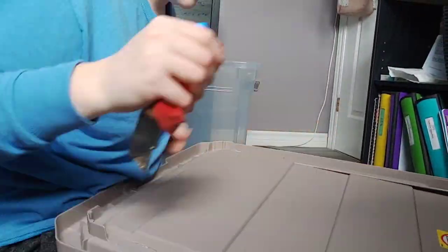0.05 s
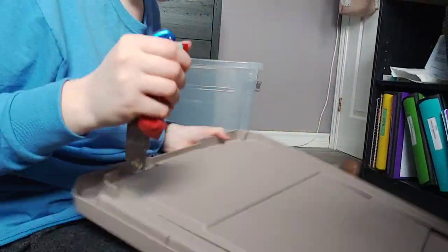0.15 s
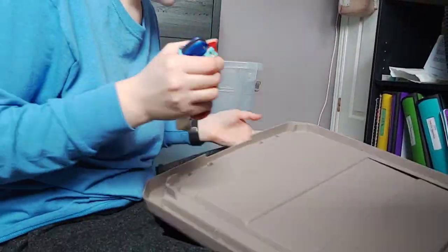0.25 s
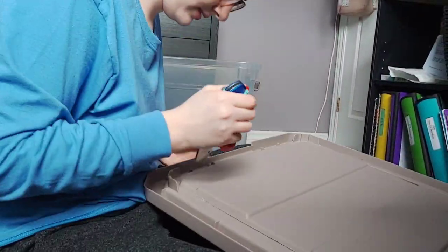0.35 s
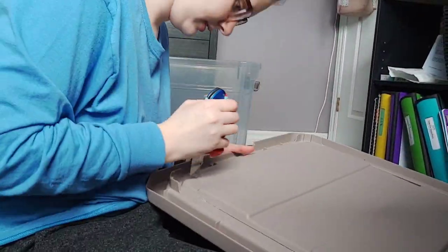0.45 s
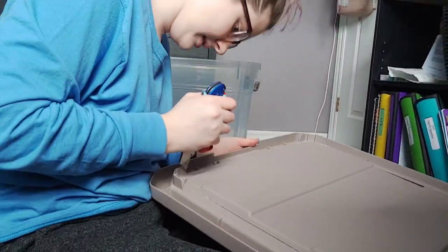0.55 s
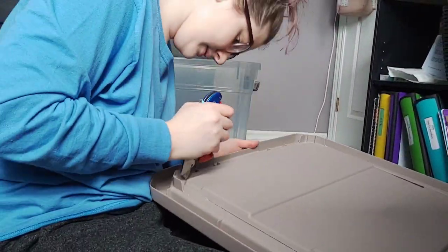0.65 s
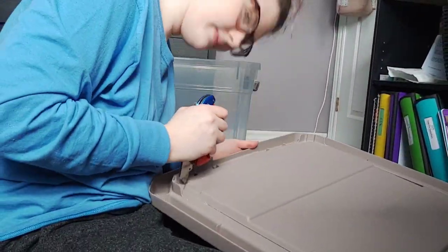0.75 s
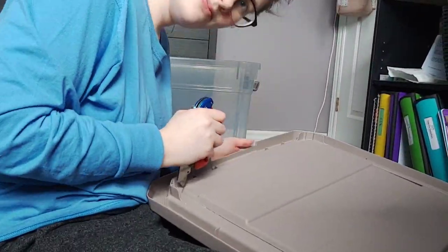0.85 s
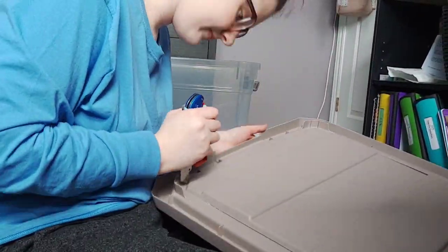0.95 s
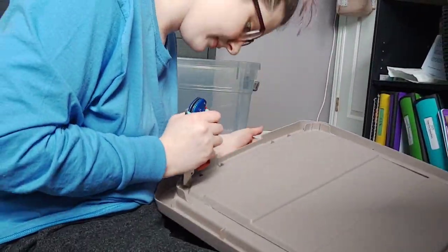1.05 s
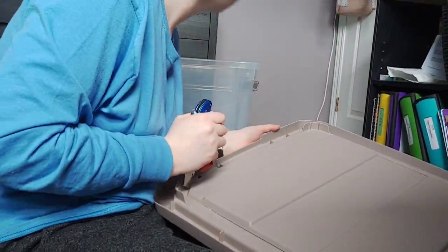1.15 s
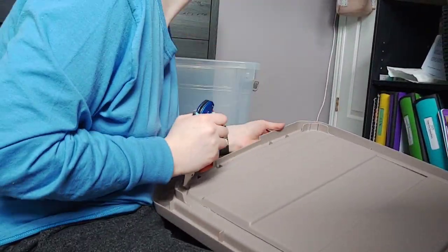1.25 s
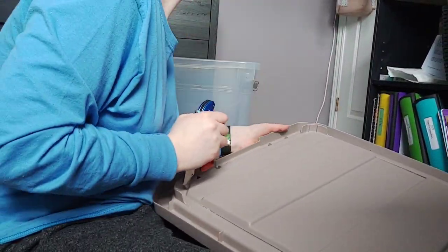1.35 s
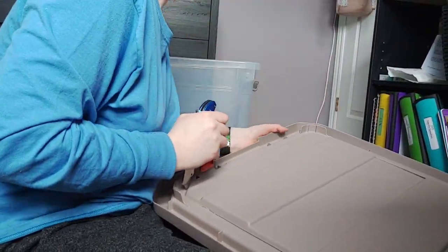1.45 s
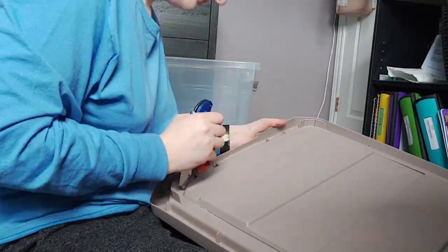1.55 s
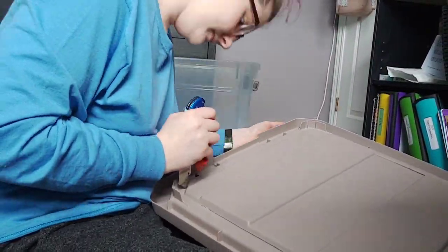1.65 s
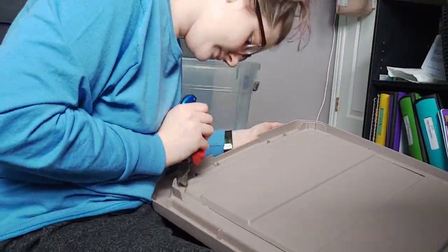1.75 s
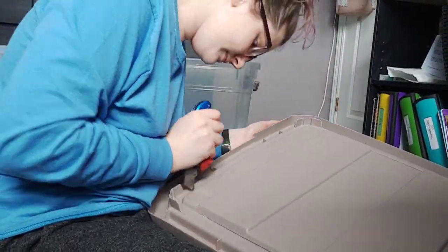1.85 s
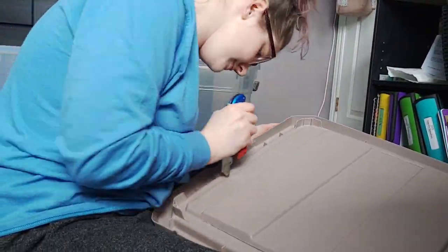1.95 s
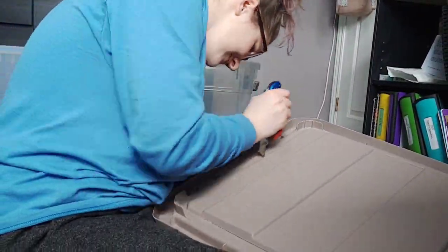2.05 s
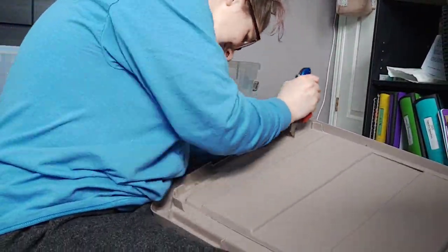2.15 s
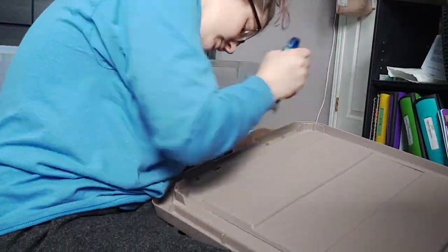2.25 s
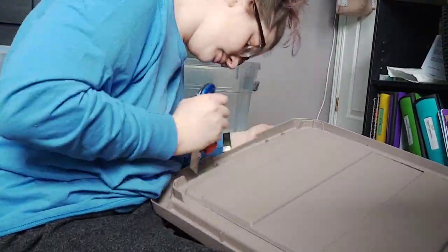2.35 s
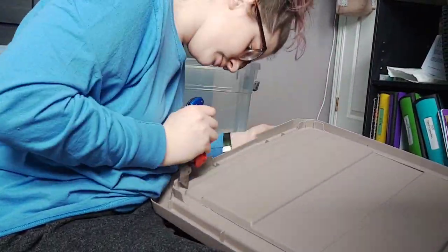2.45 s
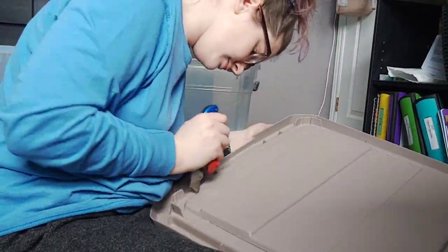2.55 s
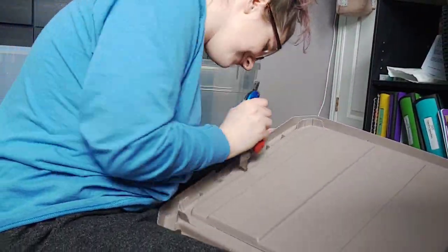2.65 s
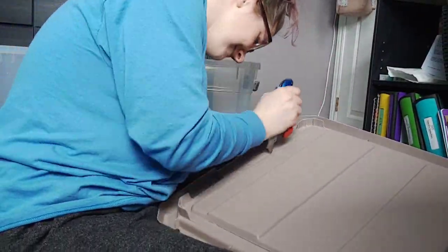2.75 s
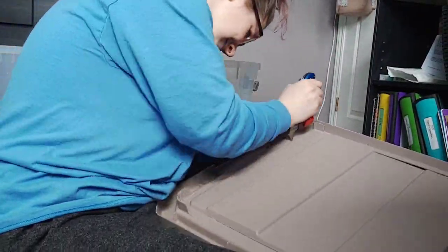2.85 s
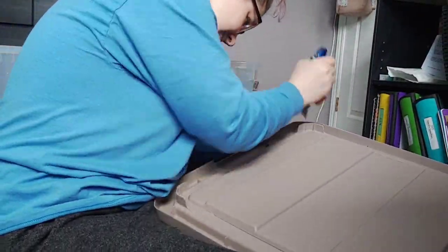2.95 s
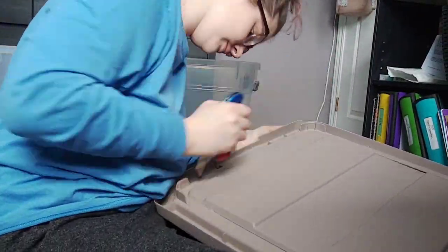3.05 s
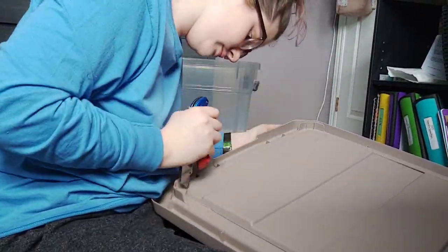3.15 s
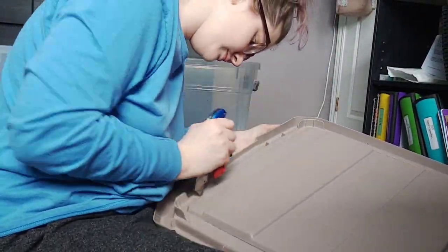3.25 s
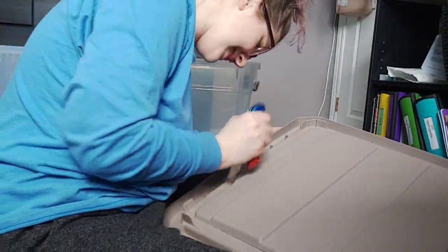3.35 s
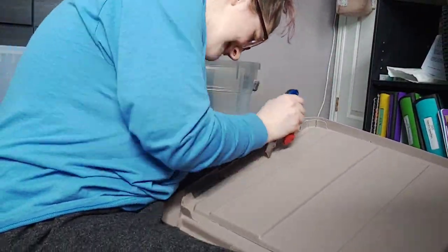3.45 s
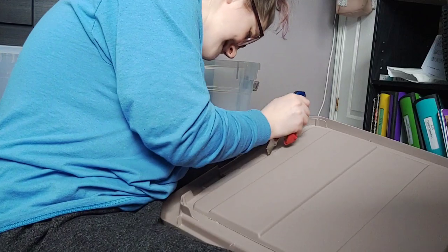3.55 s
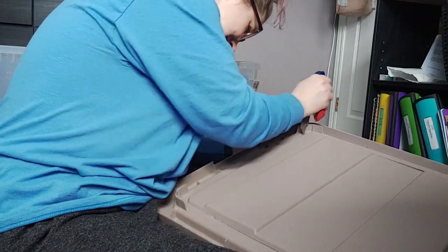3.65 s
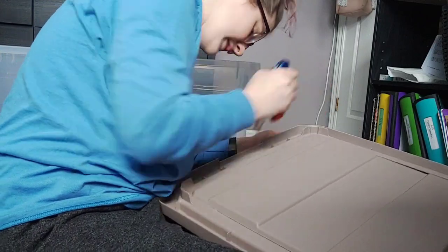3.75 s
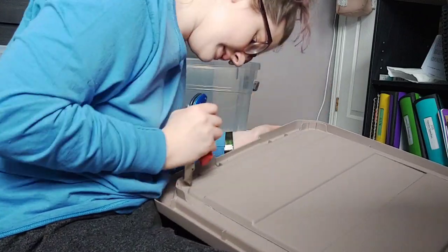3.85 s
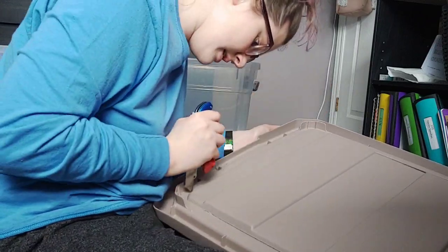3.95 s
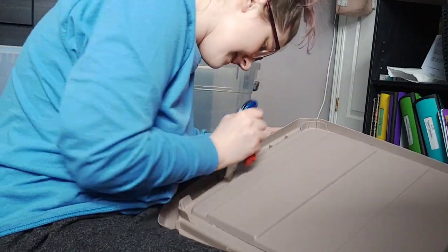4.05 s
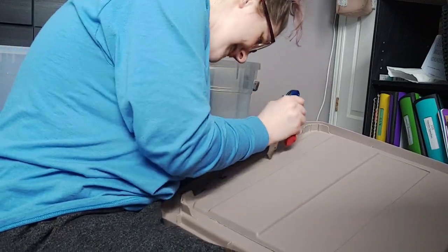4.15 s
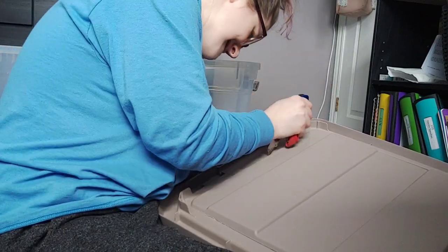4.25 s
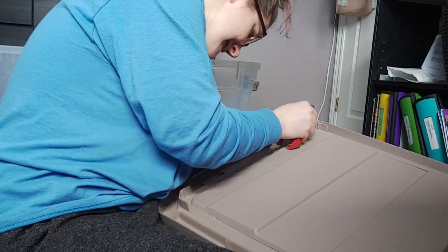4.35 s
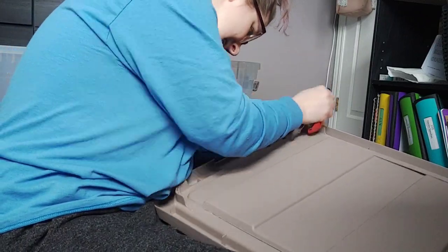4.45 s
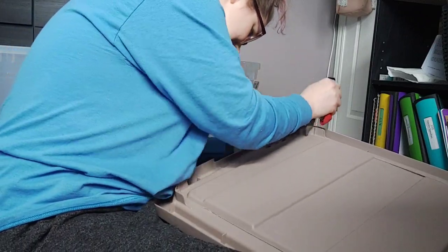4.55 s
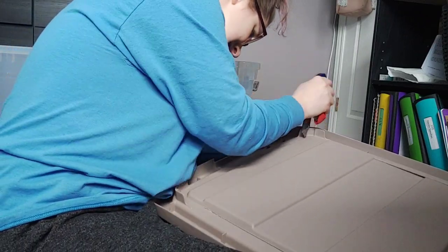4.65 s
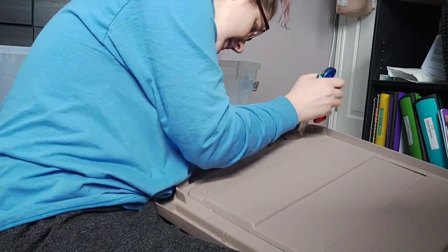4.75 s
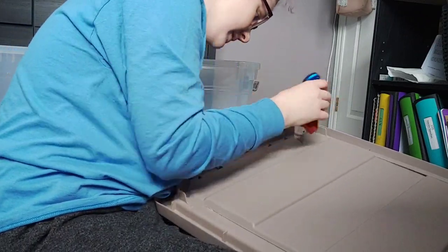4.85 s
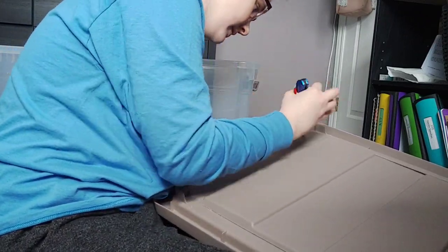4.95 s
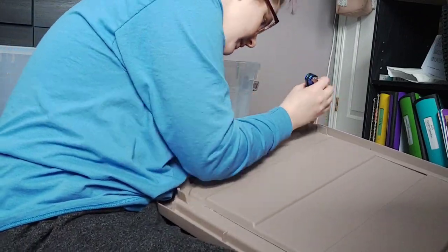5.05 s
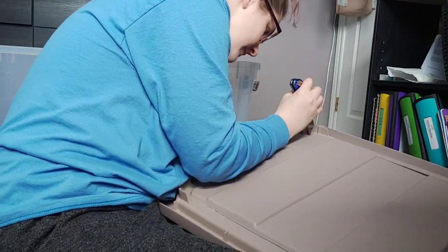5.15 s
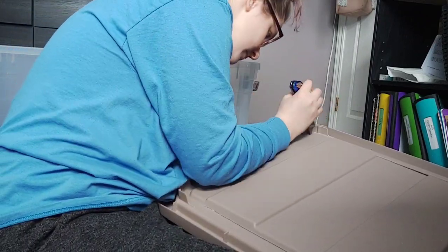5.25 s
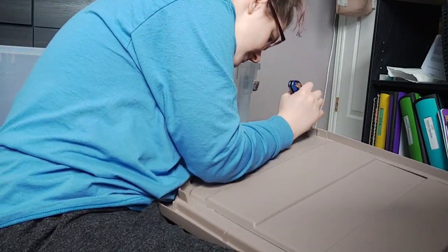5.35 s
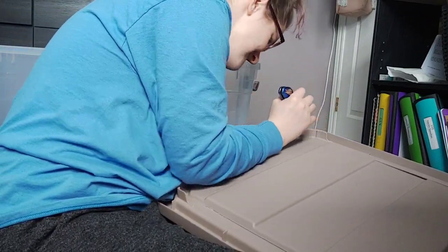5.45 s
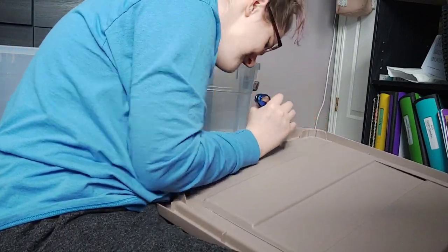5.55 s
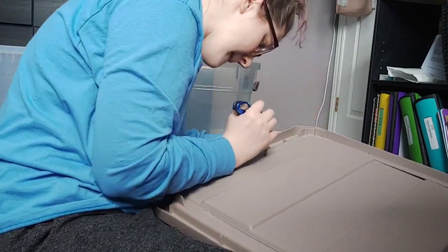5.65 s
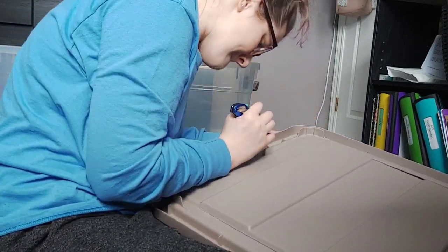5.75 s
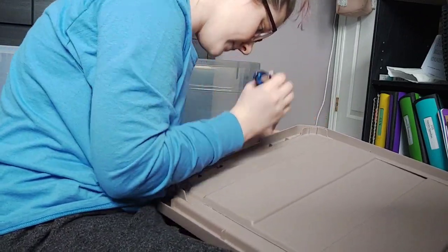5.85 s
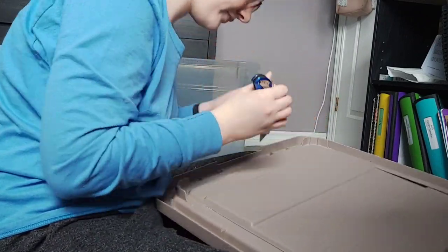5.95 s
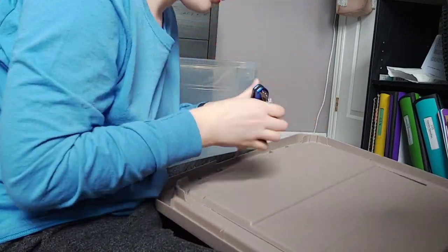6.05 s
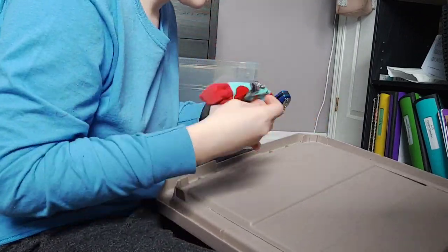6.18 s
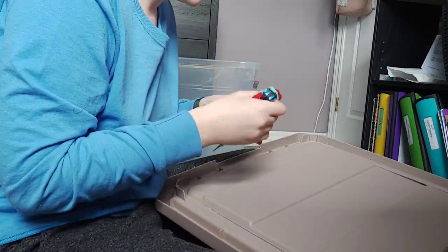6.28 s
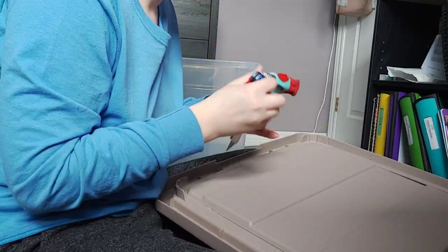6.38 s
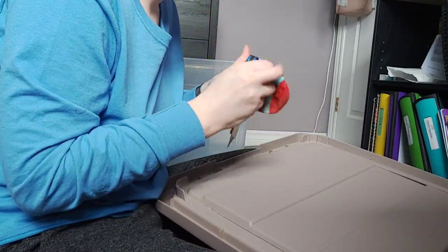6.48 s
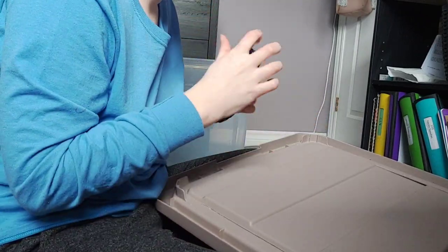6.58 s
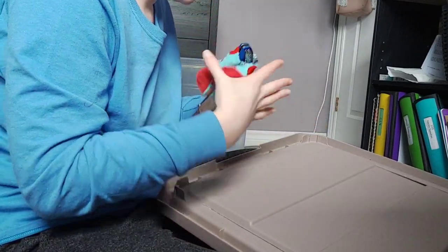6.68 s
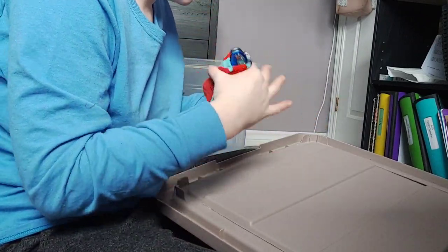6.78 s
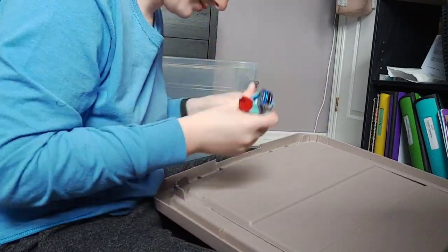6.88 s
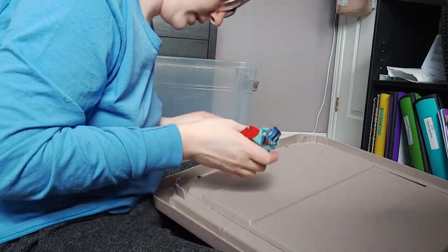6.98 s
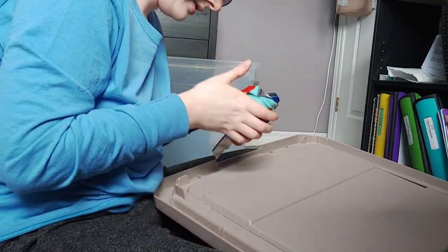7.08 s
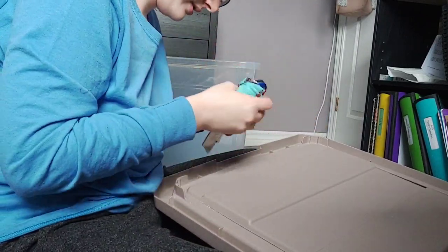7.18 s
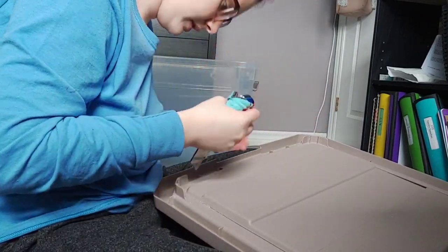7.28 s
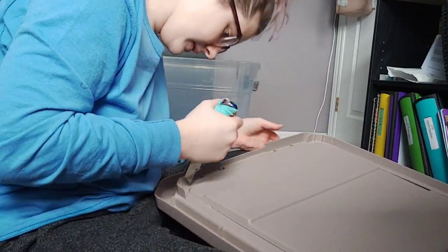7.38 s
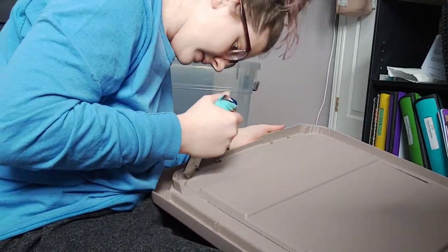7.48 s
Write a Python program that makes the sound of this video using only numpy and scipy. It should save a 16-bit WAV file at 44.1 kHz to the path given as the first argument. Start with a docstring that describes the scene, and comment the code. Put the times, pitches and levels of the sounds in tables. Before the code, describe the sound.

A plastic storage lid knocks hollowly at about 0.2 seconds, the loudest sound, followed by a quick clatter and scrape. Light scuffs, ticks and faint creaks follow. From about 1.8 seconds a box cutter works through the plastic in short, dry, irregular rasps, slipping and sticking in clusters, with small clicks between them. Sharper cracks come at about 4.7, 5.1, 5.4 and 5.9 seconds, each ringing briefly in the lid, mixed with more scraping and tiny creaks. After 6 seconds the cutting stops; skin rubs softly on the handle with a few faint ticks until about 7.3 seconds. A light hollow knock on the lid comes at 7.4 seconds. Everything is close, in a small furnished room with little echo. Underneath are faint sleeve rustle, hiss and rumble, with a faint low wavering hum near 5 and 7 seconds.

```python
"""A small room, close to a plastic storage box: a box cutter is pulled again and again through its lid.
The lid knocks as it is set in place; then the blade rasps along in short slips, sticks, and cracks free.
Every tiny tear and snap rings the lid's damped modes, and now and then one mode sings out as a creak.
Skin rubs the handle, sleeves rustle over faint hiss and rumble, and twice a low hum glides past."""
import sys
import numpy as np
from scipy import signal
from scipy.fft import rfft, irfft
from scipy.io import wavfile
from scipy.ndimage import uniform_filter1d

SR = 44100
rng = np.random.default_rng(int(sys.argv[2]) if len(sys.argv) > 2 else 0)


def log_audio(samples):
    """Write samples as a 16-bit WAV file to the path given in sys.argv[1]."""
    # one column per channel
    frames = np.atleast_2d(samples).T
    # limit to full scale, then quantise
    limited = np.clip(frames, -1, 1)
    pcm = np.round(limited * 32767).astype(np.int16)
    wavfile.write(sys.argv[1], SR, pcm)


N = 331632


def amp(db):
    """Decibels to gain."""
    return 10 ** (np.asarray(db) / 20)


def unit(x):
    """Scales to an rms of one."""
    return x / np.sqrt(np.mean(x ** 2) + 1e-20)


def pan(left_db):
    """Stereo gains that put the left channel left_db above the right."""
    return amp([[left_db / 2], [-left_db / 2]])


def curve_at(points, hz):
    """Reads a curve over log frequency."""
    freq_hz, value = np.transpose(points)
    return np.interp(np.log(hz + 1), np.log(freq_hz), value)


def flutter(size, smooth_samples):
    """A smoothed random modulator with an rms of one."""
    return unit(uniform_filter1d(rng.standard_normal(size), size=smooth_samples))


def add(mix, start_s, sound):
    """Mixes a stereo sound in at start_s."""
    part = mix[:, max(round(start_s * SR), 0):][:, :sound.shape[1]]
    part += sound[:, :part.shape[1]]


# Slips of the blade; body and treble are relative to the level:
# start_s, length_s, level_db, body_db, treble_db
SLIPS = [(.32, 0.021, -43, 2, 7), (.503, .032, -52, 8, 0.5), (1.832, 0.043, -42, 0, -5),
         (1.901, .028, -46, -4, -5), (1.938, 0.18, -50, -6, -5), (2.108, 0.075, -46, -10.5, -5.5),
         (2.526, 0.03, -37.5, -3.5, -2), (2.564, 0.061, -44, -4, -8), (2.638, .046, -44.5, -9, -10),
         (2.743, 0.062, -42.5, -7.5, -5.5), (2.854, 0.029, -37.5, -12, -1.5), (2.94, 0.024, -58, -6, 6.5),
         (3.248, .026, -37.5, -4, -0.5), (3.277, .021, -44, 0.5, -2.5), (3.308, 0.064, -70, 15, 4),
         (3.359, 0.029, -45, -3.5, -2), (3.397, 0.031, -45, -8, -9.5), (3.601, 0.028, -45, -2, -2.5),
         (3.628, 0.033, -38, -12.5, -5.5), (3.998, 0.013, -41, -0.5, -5.5), (4.014, 0.027, -41, -1, 1.5),
         (4.064, 0.066, -45, -4.5, -3), (4.413, 0.021, -38.5, -1.5, -4.5), (4.443, 0.029, -52.5, -1, -3),
         (4.504, 0.058, -54, -1, -0.5), (4.643, 0.0056, -36, 0.5, -4), (4.671, 0.032, -45.5, -0.5, 0),
         (5.427, 0.0083, -40.5, -1.5, -2.5), (5.443, 0.055, -49, -2, -5), (5.527, 0.07, -51.5, 0, -6),
         (5.877, 0.041, -45, 1.5, -6), (5.922, 0.017, -39, -3, 3.5)]


def blade_slips(attack_s=0.022, release_s=0.039):
    """The blade slips forward through the plastic in bright, even rasps; short ones peak at their end."""
    out = np.zeros((2, N))
    spots = [lid_ring(t60_s=0.021, panel_db=-17)[:, :2400] for _ in range(24)]
    for start_s, length_s, level_db, body_db, treble_db in SLIPS:
        rise_s = min(attack_s, length_s)
        push = pressure(rise_s, hold_s=length_s - rise_s, fall_s=min(release_s, 1.66 * length_s))
        rasp = stick_slip(push, spots, grains_per_s=12000, spread_db=2.5, judder_db=1.6)
        rasp = band_eq(rasp, np.sum(push ** 2), level_db, body_db, treble_db, bite_db=1.4, left_db=1.5)
        add(out, start_s, rasp)
    return out


def pressure(rise_s, hold_s, fall_s, size=16000):
    """Pressure on the lid builds, holds and lets go."""
    t = np.arange(size) / SR
    attack = np.sin(np.pi / 2 * np.clip(t / rise_s, 0, 1)) ** 1.5
    release = np.clip(1 - (t - rise_s - hold_s) / fall_s, 0, 1) ** 2
    return attack * release


def stick_slip(push, spots, grains_per_s, spread_db, judder_db, spot_s=0.05):
    """Thousands of tiny tears or catches a second, clumped by stick and slip; each rings the lid."""
    size = len(push)
    judder = flutter(size, 140)
    grains = (rng.random(size) < grains_per_s / SR) * rng.choice([-1, 1], size)
    accents = np.minimum(rng.exponential(1, size), 4)
    grains = grains * push * amp(spread_db * accents + judder_db * judder)
    # the contact travels, crossfading from one spot's ring to the next
    travel = np.arange(size) / SR / spot_s
    spots_passed = int(travel[push > 0].max(initial=0)) + 2
    out = 0
    for step, spot in enumerate(rng.permutation(len(spots))[:spots_passed]):
        fade = np.cos(np.pi / 2 * np.minimum(abs(travel - step), 1))
        out = out + signal.oaconvolve((grains * fade)[None], spots[spot], axes=1)
    return out


# Knocks, cracks and ticks, voiced like the slips: start_s, level_db, body_db, treble_db
SNAPS = [(.1569, -10.5, -0.5, -9), (0.1856, -21, -12, 4), (0.211, -35, 7.5, -25), (.335, -31, -4.5, 7),
         (0.7686, -58.5, 7, -1.5), (1.583, -49, 8.5, -8.5), (1.735, -66, 12.5, -18),
         (1.8262, -53.5, 15.5, -2), (2.225, -52, -7.5, 5), (2.2905, -62, -22.5, 7.5),
         (2.9417, -58.5, -26.5, 14), (3.227, -52, 12.5, 6.5), (3.885, -41, 6, -7), (4.354, -57, 9, -20),
         (4.677, -31, 3, 5), (4.6792, -26, -10, 2), (4.791, -44, 6.5, -12), (4.958, -41, 1, -12),
         (5.1099, -29, -4, -25), (5.1145, -29, -22, -4.5), (5.277, -48.5, 3, -1.5), (5.358, -53.5, -14, -7),
         (5.4344, -34.5, -6.5, 2), (5.887, -44, 11, 3.5), (5.9162, -30.5, 4.5, -14), (6.0408, -53, -8.5, 2),
         (6.405, -64, -7, -2.5), (6.489, -61.5, -3, 9), (6.563, -62.5, -10, 9.5), (6.778, -61, -5, 8.5),
         (7.425, -42, 4, 4)]


def cracks(attack_s=0.0003):
    """A knock or split rings the lid once; the more body it has, the longer it rings."""
    out = np.zeros((2, N))
    for start_s, level_db, body_db, treble_db in SNAPS:
        t60_s = 0.034 * 2 ** (body_db / 22)
        ring = lid_ring(t60_s, panel_db=-10)
        attack = 1 - np.exp(-np.arange(ring.shape[1]) / SR / attack_s)
        energy = SR * t60_s / (2 * np.log(1000))  # of a decay that starts at full level
        snap = band_eq(ring * attack, energy, level_db, body_db, treble_db, bite_db=1.5, left_db=4)
        add(out, start_s, snap)
    return out


# Cutter scuffing the lid and, at 0.204 s, the first knock's faint ring dying away:
# start_s, length_s, level_db, body_db, treble_db
SCUFFS_AND_TAIL = [(0.091, 0.14, -53, 12, -1.5), (.125, 0.096, -38, 12.5, -10), (0.204, 0.2, -60, -2, 3),
                   (0.276, .1, -48, 9.5, -6), (.395, 0.046, -62.5, 22, 0), (.42, 0.047, -38.5, 5.5, -8.5),
                   (.64, 0.1, -69.5, 12, -5.5), (.87, 0.18, -61.5, 3.5, -5), (1.003, 0.039, -51.5, 2, -13),
                   (1.033, 0.017, -52.5, 14, -4), (1.05, .095, -64, 2, 2), (1.125, 0.066, -51.5, 6.5, -17),
                   (1.19, .12, -58, 6.5, -4.5), (1.27, 0.097, -57, 8.5, -12.5), (1.554, .07, -59, 0, 1),
                   (1.62, 0.072, -52, 14, -7.5), (2.43, 0.069, -60.5, 6.5, -6.5),
                   (3.107, 0.061, -55, 6, -8), (3.686, .05, -50.5, 3.5, -8), (3.877, 0.04, -42.5, 6.5, -10),
                   (3.931, 0.14, -60.5, 10, -7), (4.78, 0.046, -44, 8, -7.5),
                   (4.942, 0.065, -43.5, 2.5, -9.5), (5.218, 0.069, -57.5, 4.5, -10),
                   (5.272, 0.045, -50, 7, -3), (5.802, 0.056, -54, -4, -11), (6.202, 0.086, -64, -9, 1),
                   (7.355, 0.082, -67, 13.5, 7), (7.425, 0.076, -52.5, 9.5, -11)]


def scuffs_and_tail(peak_share=0.31):
    """Lid and cutter rub in blunt swells, mostly body; one faint swell is the first knock's tail."""
    out = np.zeros((2, N))
    spots = [lid_ring(t60_s=0.046, panel_db=-16)[:, :2400] for _ in range(24)]
    for start_s, length_s, level_db, body_db, treble_db in SCUFFS_AND_TAIL:
        push = pressure(rise_s=peak_share * length_s, hold_s=0, fall_s=(1 - peak_share) * length_s)
        swell = stick_slip(push, spots, grains_per_s=6000, spread_db=3, judder_db=2.2)
        swell = band_eq(swell, np.sum(push ** 2), level_db, body_db, treble_db, bite_db=-1.5, left_db=0.5)
        add(out, start_s, swell)
    return out


# Creaks and booms of the lid and, at 5.06 s, a faint 384 Hz overtone of the first low hum:
# start_s, t60_s, pitch_hz, level_db
TONES = [(.13, 0.056, 556, -28), (0.158, 0.13, 92, -37), (.159, 0.059, 154, -21), (.157, 0.044, 367, -18.5),
         (.157, 0.022, 518, -11.5), (1.215, 0.13, 1235, -56), (1.285, .12, 1256, -54.5),
         (1.636, 0.08, 514, -47.5), (4.957, 0.047, 980, -33.5), (4.975, .06, 445, -43),
         (5.06, 0.79, 384, -58.5), (5.11, 0.043, 260, -38.5), (5.111, 0.018, 894, -27),
         (5.114, 0.02, 1540, -31.5), (5.282, 0.067, 390, -47), (5.922, 0.057, 463, -32),
         (7.424, 0.049, 259, -33), (7.426, 0.053, 360, -33.5)]


def creaks_and_overtone(wobble=0.014, rise_share=0.088, size=16000):
    """Wobbling, decaying tones: lid modes set singing by a knock or the blade, and the hum's overtone."""
    out, t = np.zeros((2, N)), np.arange(size) / SR
    for start_s, t60_s, pitch_hz, level_db in TONES:
        rise_s = rise_share * t60_s
        attack = np.sin(np.pi / 2 * np.minimum(t / rise_s, 1))
        decay = amp(level_db - 60 * np.maximum(t - rise_s, 0) / t60_s)
        bent_hz = pitch_hz * (1 + wobble * flutter(size, 300))
        tone = -np.sqrt(2) * attack * decay * np.sin(2 * np.pi * np.cumsum(bent_hz) / SR)
        add(out, start_s, np.array([tone, tone]))
    return out


# The lid's boxy panel modes: pitch_hz, gain_db, t60_s
PANEL_MODES = [(322, 1.5, 0.07), (397, 0, 0.036), (492, 1, 0.018), (540, -6.5, 0.063), (736, -6, 0.027),
               (916, -5.5, 0.042), (1082, -4, 0.053), (1250, -11.5, 0.043), (1560, -7.5, 0.022)]
# Tone of its wash of dense modes: freq_hz, gain_db
WASH_EQ = [(110, -17), (180, -11), (290, 3.5), (650, -1), (1000, 2), (1600, -5.5), (2100, -7.5),
           (3300, -7.5), (4350, -5), (5200, -15.5), (7500, -11), (10500, -12), (11900, -22), (16000, -27)]


def lid_ring(t60_s, panel_db, evenness=0.4, size=6000):
    """The lid's answer to one snap: dense damped modes, and panel modes whose mix depends on the spot."""
    t, hz = np.arange(size) / SR, np.fft.rfftfreq(size, 1 / SR)
    weights = 1 + 0.25 * rng.standard_normal(len(PANEL_MODES))
    panel = sum(weight * amp(gain_db - 60 * t / ring_s) * np.sin(2 * np.pi * pitch_hz * t)
                for weight, (pitch_hz, gain_db, ring_s) in zip(weights, PANEL_MODES))
    wash = stereo_noise(WASH_EQ, size, lean=1) * amp(-60 * t / t60_s)
    # soft plastic is so damped that its modes overlap: no single one stands far out
    spectrum = rfft(wash)
    bumps = np.sqrt(np.mean(abs(spectrum) ** 2, 0)) / amp(curve_at(WASH_EQ, hz))
    gate = t < min(2 * t60_s, 0.09)
    smoothed = irfft(spectrum / bumps ** evenness, size) * gate
    return unit(smoothed) * np.sqrt(np.mean(wash ** 2)) - amp(panel_db) * panel


# The plastic's four bands (body, middle, bite, fizz): low_hz, high_hz
BANDS = [(135, 650), (700, 2200), (2200, 5200), (5200, 17000)]


def band_eq(x, energy, level_db, body_db, treble_db, bite_db, left_db):
    """Brings each band to the given energy, then sets its gain and pan; the body stays centred."""
    out = np.zeros_like(x)
    gains_db = (body_db, 0, bite_db + 0.44 * treble_db, treble_db)  # harder contact adds bite and fizz
    for edges_hz, gain_db, side_db in zip(BANDS, gains_db, (0, left_db, left_db, left_db)):
        band = signal.sosfilt(signal.butter(4, edges_hz, "band", fs=SR, output="sos"), x)
        band *= np.sqrt(energy / (np.sum(band ** 2, 1, keepdims=True) + 1e-20))
        out += amp(level_db + gain_db) * unit(pan(side_db)) * band
    return out


# How alike left and right sound: freq_hz, correlation
STEREO_LIKENESS = [(100, 0.99), (500, 0.5), (1000, 0.4), (1700, .25), (3000, 0.03), (16000, 0.1)]
# The two microphones' unequal tone: freq_hz, left_over_right_db
STEREO_LEAN = [(250, 9), (750, -6), (2200, 4), (3100, -2.5), (4000, 6), (5300, 1.5), (5900, 13.5),
               (7500, -3), (9200, 7.5), (10500, -5), (12000, -2)]


def stereo_noise(eq, size, lean=0):
    """Coloured noise, narrow in the bass and wide in the treble; lean tips its bands left or right."""
    hz = np.fft.rfftfreq(size, 1 / SR)
    left, unrelated = rfft(rng.standard_normal((2, size)))
    likeness = curve_at(STEREO_LIKENESS, hz)
    right = likeness * left + np.sqrt(1 - likeness ** 2) * unrelated
    tilt = amp(lean * curve_at(STEREO_LEAN, hz) / 2)
    pair = np.array([left * tilt, right / tilt])
    return unit(irfft(pair * amp(curve_at(eq, hz)), size))


# The room's decay: freq_hz, t60_s
ROOM_DECAY = [(150, .35), (1000, 0.33), (4000, 0.15), (12000, 0.19)]


def room_reverb(x, wet_db=-19, echoes_per_s=2500, predelay_s=0.007, size=20000):
    """A small furnished room: sparse reflections, the treble dying first."""
    echoes = rng.standard_normal((2, size)) * (rng.random((2, size)) < echoes_per_s / SR)
    echoes *= np.arange(size) > predelay_s * SR
    hz, t, spectrum = signal.stft(echoes, SR, nperseg=256)
    decay = amp(-60 * t / curve_at(ROOM_DECAY, hz)[:, None])
    tail = signal.istft(spectrum * decay, SR, nperseg=256)[1]
    return amp(wet_db) * signal.fftconvolve(x, tail / np.linalg.norm(tail[0]), axes=1)[:, :N]


# The cutter turning in the hand: start_s, length_s, level_db
HANDLE_RUBS = [(6.369, .077, -62), (6.525, .038, -53.5), (6.572, 0.057, -57), (6.629, 0.065, -49),
               (6.686, 0.052, -57.5), (6.675, .62, -67.5)]
# Tone of skin on the handle: freq_hz, gain_db
HANDLE_EQ = [(200, -20), (700, 1.5), (1100, 0.5), (1500, 0.5), (2400, 2.5), (3100, -7), (4200, -17),
             (6000, -31), (16000, -38)]


def handle_rubs():
    """Skin slides over the handle in a few soft rubs."""
    t = np.arange(N) / SR
    slide = sum(amp(level_db) * np.sin(np.pi * np.clip((t - start_s) / length_s, 0, 1)) ** 2
                for start_s, length_s, level_db in HANDLE_RUBS)
    return stereo_noise(HANDLE_EQ, N) * slide * pan(left_db=3)


# Shifts of the arms and, at 5.1 s, a swell of low rumble under the first hum:
# centre_s, half_length_s, rustle_db, rumble_db
SWELLS = [(.22, 0.31, -70, -60), (1.078, .28, -64, -66), (3.099, 0.31, -69.5, -73),
          (3.796, 0.13, -67.5, -77.5), (4.646, 0.35, -68.5, -60), (5.1, .25, -84, -55.5),
          (5.436, 0.24, -64.5, -61), (5.917, 0.22, -68, -58), (6.697, 0.93, -66.5, -66.5),
          (7.506, 0.18, -55.5, -60)]


def swell_gains(rest_rustle_db=-67, rest_rumble_db=-66):
    """Rustle and rumble rise in smooth swells over their resting levels."""
    t = np.arange(N) / SR
    power = amp([[rest_rustle_db], [rest_rumble_db]]) ** 2
    for centre_s, half_length_s, rustle_db, rumble_db in SWELLS:
        swell = np.maximum(1 - ((t - centre_s) / half_length_s) ** 2, 0)
        power = power + (amp([[rustle_db], [rumble_db]]) * swell) ** 2
    return np.sqrt(power)


# Tone of the cloth: freq_hz, gain_db
SLEEVE_EQ = [(100, -24), (400, 2), (900, -2.5), (2000, -4.5), (4000, -9.5), (7000, -15), (10000, -11.5),
             (16000, -16.5)]


def sleeves(gain, folds_db=2):
    """Cloth and skin rub unevenly as the arms move."""
    folds = amp(folds_db * flutter(N, 900))
    return stereo_noise(SLEEVE_EQ, N) * gain * folds


# Two low hums, a list of breakpoints each: time_s, pitch_hz, fundamental_db, octave_db
HUM_GLIDES = [
    [(4.84, 70, -74, -84.5), (4.96, 71.8, -53, -58.5), (5.06, 69.2, -55.5, -58.5), (5.14, 62.3, -73.5, -57),
     (5.25, 70.5, -54.5, -58.5), (5.36, 65.4, -85, -75)],
    [(6.65, 53.5, -75, -91), (6.76, 53.2, -50, -64), (6.84, 60.7, -54.5, -63), (6.95, 66.6, -57.5, -60),
     (7.04, 72.2, -61.5, -55), (7.18, 65.4, -77, -56.5), (7.42, 66, -77, -69.5)],
]


def hums():
    """A faint low tone and its octave swell, glide and fade."""
    out, t = np.zeros(N), np.arange(N) / SR
    for glide in HUM_GLIDES:
        time_s, *columns = np.transpose(glide)
        pitch_hz, fundamental_db, octave_db = [np.interp(t, time_s, column) for column in columns]
        phase = 2 * np.pi * np.cumsum(pitch_hz) / SR
        tone = amp(fundamental_db) * np.sin(phase) + amp(octave_db) * np.sin(2 * phase)
        soft_gate = uniform_filter1d(1.0 * ((t > time_s[0]) & (t < time_s[-1])), size=1000)
        out += np.sqrt(2) * soft_gate * tone
    return out


# Tone of the low rumble: freq_hz, gain_db
RUMBLE_EQ = [(20, -20), (65, 1), (130, -4), (200, -6.5), (320, -8.5), (700, -29), (2000, -49.5)]
# Tone of the room's hiss: freq_hz, gain_db
HISS_EQ = [(25, -20.5), (60, -22), (100, -21), (270, -35), (600, -37.5), (1100, -40), (2000, -42),
           (3700, -41), (6500, -48), (8400, -53.5), (10400, -47), (16000, -45)]


def room_tone(rumble_gain, hiss_db=-69):
    """A bed of steady hiss, with the shifting rumble and the hums a little to the left."""
    low_end = rumble_gain * stereo_noise(RUMBLE_EQ, N) + hums()
    return amp(hiss_db) * stereo_noise(HISS_EQ, N) + low_end * pan(left_db=3)


def scene():
    """The plastic up front with a touch of room; hand, sleeves and room tone underneath."""
    close = blade_slips() + scuffs_and_tail() + cracks() + creaks_and_overtone()
    rustle_gain, rumble_gain = swell_gains()
    return close + room_reverb(close) + handle_rubs() + sleeves(rustle_gain) + room_tone(rumble_gain)


def record(dry):
    """Clips at full scale, adds a slight DC offset and cuts the very top."""
    dc_offset, cutoff_hz = -0.0032, 16100
    clipped = np.clip(dry, -1, 1) + dc_offset
    lowpass = signal.firwin(511, cutoff_hz, window=("kaiser", 9), fs=SR)
    return signal.oaconvolve(clipped, lowpass[None], "same")


dry = scene()
out = record(dry)
log_audio(out)
```